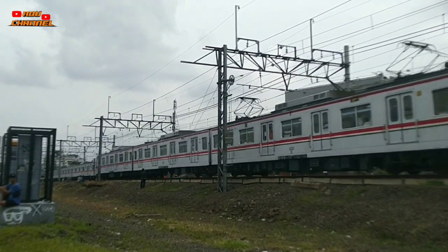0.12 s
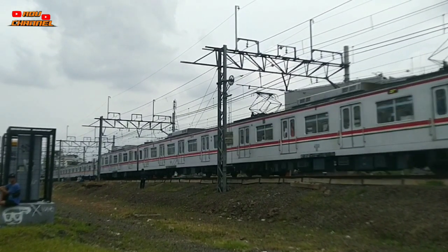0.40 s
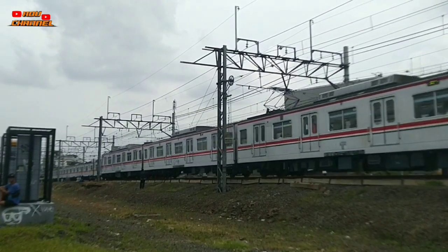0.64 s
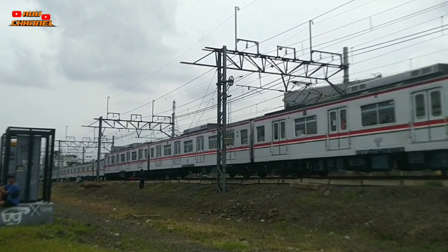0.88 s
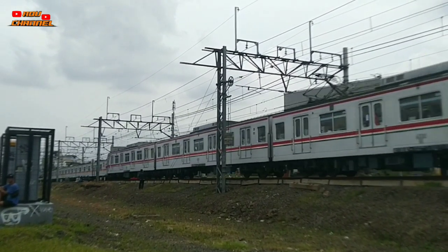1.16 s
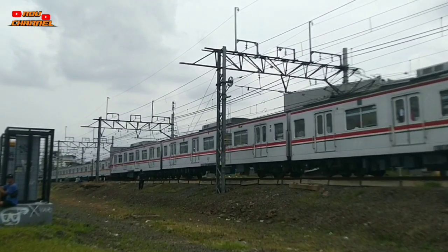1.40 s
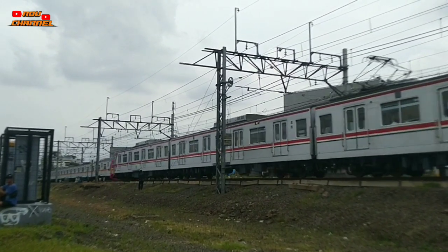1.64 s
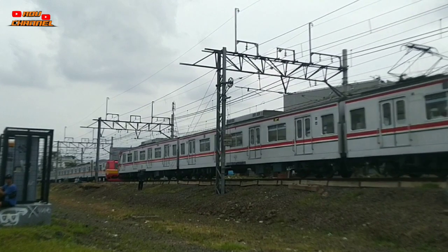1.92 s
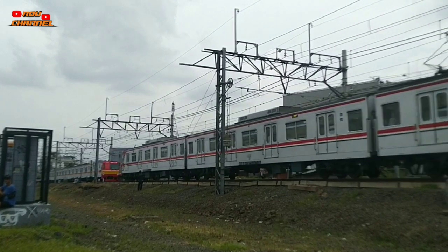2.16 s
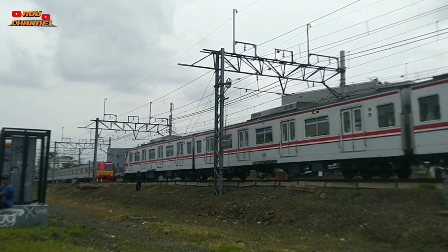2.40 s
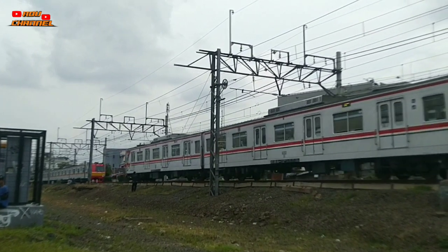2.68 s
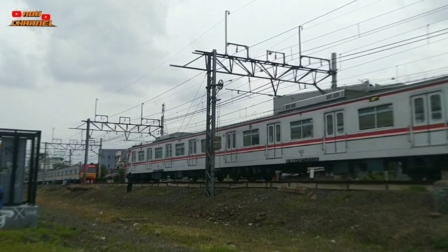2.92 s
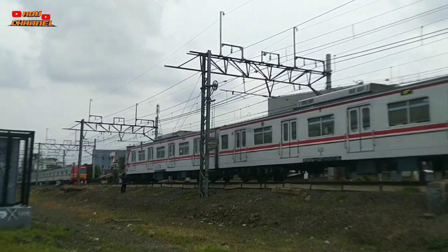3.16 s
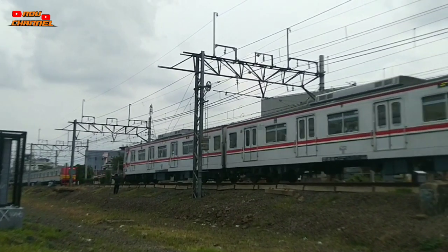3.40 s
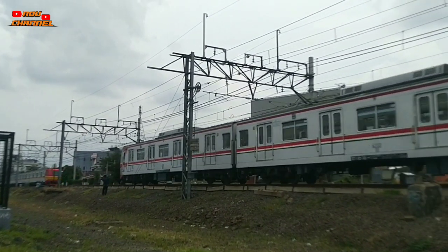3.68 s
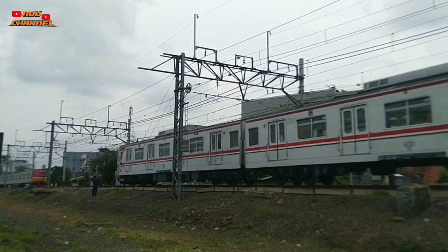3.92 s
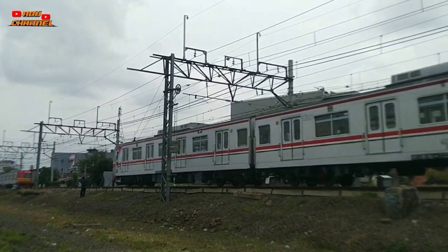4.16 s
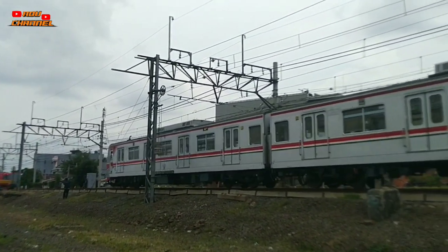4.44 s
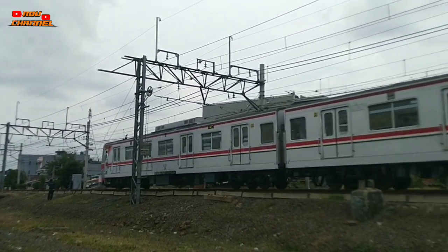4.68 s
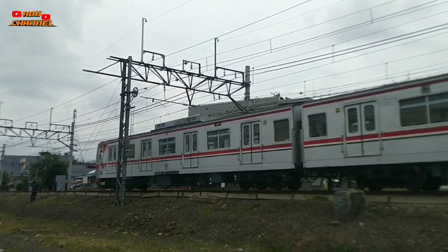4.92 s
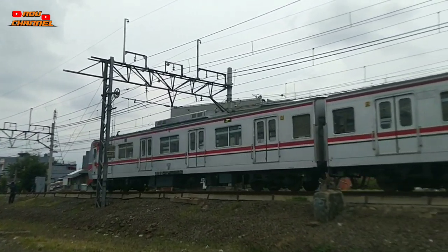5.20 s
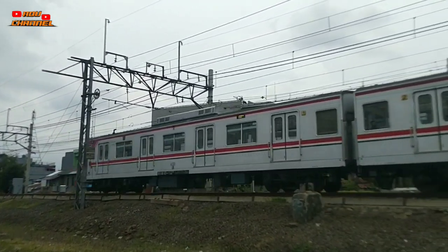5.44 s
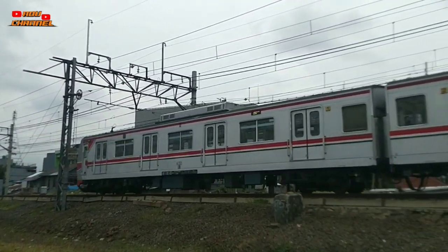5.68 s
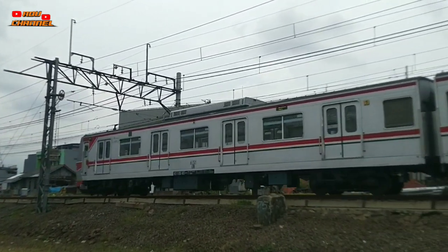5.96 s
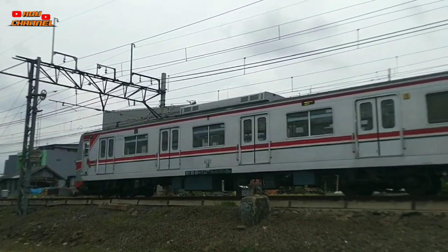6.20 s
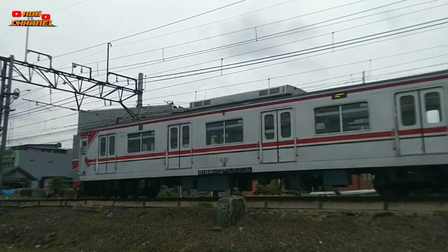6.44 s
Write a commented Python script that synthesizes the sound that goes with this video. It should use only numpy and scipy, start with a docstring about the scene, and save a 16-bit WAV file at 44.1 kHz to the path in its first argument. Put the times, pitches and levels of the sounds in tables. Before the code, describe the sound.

Train cars roll by outdoors at moderate speed, already passing at the start and still passing at the end. Wheel blows come in pairs and overlapping clusters, dull thumps mixed with hard metallic clacks. Rolling noise fills the gaps, with airy hiss swelling and fading, wavering gear hums and one tiny late squeal. The handheld stereo pickup is near the track, its automatic gain dipping after loud hits.

```python
"""Electric train over rail joints

A braking train rolls past over four rail joints. Each axle's blow gives a deep thud (damped sines) with a boom
of the track bed, and at some joints a bright steel clank (noise bursts through resonances). Beneath run rolling
noise and swells of hiss (shaped random spectra), faint gliding hums and one short squeal (wavering tones).
Gain control ducks the sound after each strong blow."""
import sys
import numpy as np
from scipy import signal
from scipy.fft import rfft, irfft
from scipy.io import wavfile
from scipy.ndimage import uniform_filter1d

SR = 44100
rng = np.random.default_rng(int(sys.argv[2]) if len(sys.argv) > 2 else 0)


def waveform_to_disk(signal):
    """Save audio, clipped to [-1, 1], as 16-bit WAV at the path in sys.argv[1]."""
    frames = np.transpose(np.atleast_2d(signal))
    scaled = np.clip(frames, -1, 1) * 32767
    samples = np.round(scaled).astype(np.int16)
    wavfile.write(sys.argv[1], SR, samples)


def magnitude_from_level(level_db):
    """Linear magnitude for a level in decibels (20 dB per decade)."""
    exponent = np.asarray(level_db, float) / 20
    return 10 ** exponent


N = 290178

CAR_M = 20  # car length


def evened(x):
    """Normalization: divides a signal by its root mean square."""
    return x / np.sqrt(np.mean(x ** 2) + 1e-20)


def read(points, hz):
    """Spectral interpolation: reads a curve linearly along a logarithmic frequency axis."""
    point_hz, value = np.transpose(points)
    return np.interp(np.log(hz + 1), np.log(point_hz + 1), value)


def add(mix, start_s, sound):
    """Superposition: adds a sound to the mix in place, cut off at the end of the mix."""
    part = mix[max(round(start_s * SR), 0):][:len(sound)]
    part += sound[:len(part)]


def travelled(t):
    """Uniform deceleration: metres the train has rolled after t seconds."""
    speed_m_s, braking_m_s2 = 7.839, .01514
    return speed_m_s * t - braking_m_s2 * t ** 2 / 2


def hiss_db(t):
    """Periodicity of a train: one car's hiss pattern repeats with distance, and single swells add in power."""
    # Level of the hiss along one car. Each row: distance travelled in metres, level in dB.
    car_hiss = [(0, -48), (1.1, -47), (2.2, -50), (9, -48.5), (10.5, -44.5), (11.2, -49), (12.3, -49),
                (13, -45), (14, -49), (15.1, -41), (15.9, -45.5), (16.4, -52.5), (18.9, -46), (20, -54)]
    # Single swells of hiss, the last one very brief.
    # Each row: centre in seconds, half width (to 1/e of the power) in seconds, level in dB.
    swell_rows = [(3.6, 0.22, -42.5), (5.83, 0.19, -45), (6.17, 0.19, -41.5), (6.5, 0.023, -51)]
    swells = sum(magnitude_from_level(2 * db) * np.exp(-((t - s) / width_s) ** 2) for s, width_s, db in swell_rows)
    car_db = np.interp(travelled(t) % CAR_M, *np.transpose(car_hiss))
    return 10 * np.log10(magnitude_from_level(2 * car_db) + swells)


def rolling(patchy_db=.8, banding_db=1.6, flicker_db=1.1):
    """Roughness excitation: wheel and rail roughness as random spectra, in four parts with moving levels."""
    # Mean levels of the passing cars. Each row: time in seconds, rumble in dB, rail drone in dB, wheel roar in dB.
    roll = [(0.0, -25.5, -38, -38), (0.6, -26, -34, -32.5), (1.1, -26.5, -30.5, -31),
            (1.9, -27, -34.5, -32), (2.7, -24.5, -33, -32), (3.5, -28, -31.5, -33),
            (4.2, -26, -35.5, -34.5), (4.8, -27.5, -36, -35.5), (5.5, -23, -35, -34.5),
            (6.58, -27.5, -35, -35)]
    # Colour of each part. Each row: frequency in Hz, relative spectral density in dB.
    rumble = [(26, -38), (45, -20.5), (76, 4), (100, 4.5), (130, -3.5), (175, -0.5), (215, 0), (273, -2.5),
              (345, -14), (420, -9), (550, -13.5), (920, -120)]
    drone = [(220, -60), (380, 6), (419, -4.5), (548, -8), (601, 5), (750, 1), (1300, -5), (1690, -29),
             (2860, -120)]
    roar = [(740, -51), (1250, -13), (1480, 0.5), (1700, -3.5), (1860, -4.5), (2030, -2.5), (2250, -5.5),
            (2480, -8), (2800, -6), (3060, -14), (3540, -17), (4300, -20.5), (6700, -30.5), (10000, -34.5),
            (16000, -97)]
    hiss = [(2500, -40), (3500, -1), (6000, -6), (9000, -2.5), (11800, -7), (13300, -6.5), (14200, -23),
            (15400, -8), (16000, -67)]

    frames, hz = N // 256 + 5, np.fft.rfftfreq(1024, 1 / SR)
    t = np.arange(frames) * 256 / SR
    a, b, c, d, patches, bands = rng.standard_normal((frames, 513, 6)).T  # each: frequency by time
    patches = uniform_filter1d(uniform_filter1d(patches, size=8, axis=0), size=12, axis=1)
    patches = evened(patches)
    # narrow bands of the noise swell and fade at random, each for about a third of a second
    bands = uniform_filter1d(uniform_filter1d(bands, size=2, axis=0), size=60, axis=1)
    bands = evened(bands) * np.clip(hz / 600, 0, 1)[:, None]  # the bass stays even
    flicker = evened(uniform_filter1d(rng.standard_normal(frames), size=6))

    s, *rolling_db = np.transpose(roll)
    levels_db = [np.interp(t, s, db) for db in rolling_db] + [hiss_db(t)]
    power = 0
    for colour, level_db in zip((rumble, drone, roar, hiss), levels_db):
        shape = magnitude_from_level(read(colour, hz)) ** 2
        power = power + np.outer(shape / shape.sum(), magnitude_from_level(level_db) ** 2)

    noise = np.array([a + 1j * b, c + 1j * d])  # two independent channels
    unit = signal.istft(noise / np.sqrt(513), nperseg=1024, noverlap=768)[1].std()
    unevenness_db = patchy_db * patches + banding_db * bands + flicker_db * flicker
    spectra = noise * np.sqrt(power) * magnitude_from_level(unevenness_db)
    return signal.istft(spectra, nperseg=1024, noverlap=768)[1][:, :N] / unit


def blows():
    """Kinematics of impact: a blow falls when an axle meets a joint.

    Rows in time order: (s, thud dB, thud Hz, sleeper dB, rail dB, wheel dB, rim dB)."""
    # Axle positions in metres ahead of a car's last axle.
    car_axles_m = (0, 2.1, 13.8, 15.9)
    # Rail joints in metres ahead of where the train's last axle starts.
    joints_m = (28.96, 45.61, 59.44, 62.395)
    # Sound of each joint. Each row: thud in dB, thud pitch in Hz, then sleeper, rail, wheel and rim hiss in dB,
    # all levels before the axle's own strength is added.
    joints = [(-16.5, 148.6, -32, -29, -27, -42), (-11.5, 175, -43.5, -28.5, -67, -52),
              (-10, 180, -27, -38, -103, -53.5), (-12, 179.8, -17.5, -21, -21.5, -39)]
    # Strength of each axle, counted from the tail. Each row: thud, sleeper, rail and wheel, in dB added to the joint.
    axles = [(-0.5, 4.5, -3.5, 0.5), (-5.5, 9, 4.5, -1), (-2.5, -1, 3, 0.7), (1, -3, 1.5, 2),
             (0.7, -2.5, 0, 2), (0.9, 1.5, 1.8, -0.2), (0.8, 3.5, -3.5, 0.5), (2, -2.5, -0.5, -4.2),
             (0, 5, -5.5, -4.5), (0, 0.7, -3, 1.5), (1.9, 3, -6, -30), (4, 1, -5.5, -2.5),
             (-6, 3.5, -3.5, -3.5), (-12, 4, -0.5, 1)]
    t, rows = np.arange(N) / SR, []
    for k, (thud_db, sleeper_db, rail_db, wheel_db) in enumerate(axles):
        car, axle = divmod(k, len(car_axles_m))
        ahead_m = CAR_M * car + car_axles_m[axle]
        for place_m, joint in zip(joints_m, joints):
            if 0 < place_m - ahead_m < travelled(t[-1]):
                s = np.interp(place_m - ahead_m, travelled(t), t)
                # the rim follows the wheel's strength
                rows.append((s, *np.add(joint, (thud_db, 0, sleeper_db, rail_db, wheel_db, wheel_db))))
    return sorted(rows)


def thuds(rise_s=.011, hold_s=.024, early_s=.006):
    """Damped oscillation: loaded by a wheel, sleepers and track swing up, hold while it presses, and die away."""
    # Modes of the track. Each row: frequency as a factor on the thud pitch, level in dB, decay by 60 dB in seconds.
    track = [(1.0, 0, .1), (.52, -12, .07), (1.47, -14, .06)]
    t, out = np.arange(SR // 4) / SR, np.zeros(N)
    swell = np.sin(np.pi / 2 * np.minimum(t / rise_s, 1)) ** 2
    after = np.maximum(t - hold_s, 0)
    for s, db, hz, *_ in blows():
        ring = sum(magnitude_from_level(level_db - 60 * after / t60) * np.sin(2 * np.pi * hz * factor * t)
                   for factor, level_db, t60 in track)
        thud = swell * ring
        add(out, s - early_s, magnitude_from_level(db) * thud / abs(thud).max())
    return out


def resonate(x, hz, width):
    """Heterodyne resonance: shifts the curve hz to zero, smooths twice and shifts back, with gain 1 at the peak."""
    turn = np.exp(2j * np.pi * np.cumsum(hz) / SR)
    r = np.exp(-np.pi * width / SR)
    return 2 * (turn * signal.lfilter([(1 - r) ** 2], [1, -2 * r, r * r], x / turn)).real


def clanks(modes, column, t60, crack_db, rattle_s, rise_s):
    """Modal excitation by impact: a sharp crack, then a moment's rattle of noise, rings the given resonances."""
    t, shake = np.arange(SR // 3) / SR, np.zeros(N)
    crack = magnitude_from_level(crack_db) * np.exp(-t / 0.0011)
    rattle = magnitude_from_level(-60 * np.maximum(t - rattle_s, 0) / t60)
    shape = np.minimum(t / rise_s, 1) * (crack + rattle)
    rows = blows()
    for row in rows:
        add(shake, row[0] - .001, magnitude_from_level(row[column]) * shape)
    # every blow shifts each resonance at random, so that no two blows ring quite alike
    blow = np.searchsorted([row[0] - .002 for row in rows], np.arange(N) / SR)
    detune = rng.uniform(.94, 1.06, (len(rows) + 1, len(modes)))[blow].T
    scale = sum(magnitude_from_level(2 * db) * width for _, width, db in modes) * np.pi / SR  # evens out the modes' total power
    channels = [sum(magnitude_from_level(db) * resonate(noise * shake, hz * k, width)
                    for (hz, width, db), k in zip(modes, detune))
                for noise in rng.standard_normal((2, N))]
    return np.array(channels) / np.sqrt(scale)


def hums(width_hz=6.5, throb_db=3.2):
    """Frequency and amplitude modulation: each tone of motor, gear or squeal wavers, throbs and glides in pitch."""
    # Faint hums of motors and gears going by, and one short wheel squeal.
    # Each row: start in seconds, end in seconds, first frequency in Hz, last frequency in Hz, level in dB.
    tones = [(.85, 2.0, 875, 865, -44), (1.0, 2.2, 935, 915, -46), (1.2, 2.7, 780, 768, -41),
             (1.4, 2.7, 618, 612, -44), (1.9, 2.9, 690, 670, -45), (2.4, 3.3, 497, 500, -41),
             (2.6, 5.4, 760, 748, -48), (3.8, 4.9, 640, 625, -48), (5.45, 5.55, 4570, 4550, -48)]
    out = np.zeros(N)
    for start, end, first_hz, last_hz, db in tones:
        count = round((end - start) * SR)
        waver, throb = (evened(uniform_filter1d(v, size=2400))[:count] for v in rng.standard_normal((2, N)))
        hz = np.linspace(first_hz, last_hz, count) + width_hz * waver
        tone = np.sqrt(2) * np.sin(2 * np.pi * np.cumsum(hz) / SR)
        add(out, start, magnitude_from_level(db + throb_db * throb) * tone * signal.windows.tukey(count, .6))
    return out


def ports(first, second):
    """Interchannel coherence: two microphone ports, most alike in the bass, the left earlier, the right louder."""
    # Each row: frequency in Hz, left-right likeness from 0 to 1.
    likeness = [(60, .99), (270, .985), (500, .8), (900, .65), (1500, .55), (2500, .4), (5000, .2),
                (14000, .2)]
    # Each row: frequency in Hz, level of left minus right in dB.
    lean_points = [(60, -4.0), (180, -2.3), (270, -3.4), (440, -4.0), (730, -1.5), (1210, -3.0),
                   (2000, -6.0), (3300, -3.0), (5440, -.5), (8980, -.3), (14800, -3.5)]
    # Each row: frequency in Hz, phase by which the left port leads in radians.
    lead = [(60, .1), (270, .33), (600, 1.15), (860, .9), (1250, 1.9), (1500, 4.2), (2100, 4.8),
            (3300, 8.0), (4500, 12), (5200, 14), (15000, 30)]
    hz = np.fft.rfftfreq(N, 1 / SR)
    same = np.clip(read(likeness, hz), 0, 1)
    left = rfft(first)
    right = same * left + np.sqrt(1 - same ** 2) * rfft(second)
    right = right * np.exp(-1j * read(lead, hz))
    lean = magnitude_from_level(read(lean_points, hz) / 2)  # half of the difference on each side
    return irfft(np.array([left * lean, right / lean]), N)


def scene():
    """Superposition: rolling noise, blows on track and steel, and hums add up at the two ports."""
    # Resonances of sleeper, rail, wheel, wheel rim and track bed.
    # Each row: frequency in Hz before the detuning of each blow, width of each smoothing in Hz, relative level in dB.
    sleeper = [(288.8, 113, -0.5), (380, 135, -4.5), (446, 27, -4)]
    rail = [(650, 276, -0.5), (782, 300, 11.5), (989, 92, 10)]
    wheel = [(1490, 580, 5.7), (1750, 390, 7.4), (2000, 122, 11.2), (2293, 770, 2.6)]
    rim = [(3980, 2700, 13.5), (5830, 2800, 1), (10940, 1400, 3.5)]
    ballast = [(168.2, 43.4, 1.2), (245.6, 65.4, -3)]
    clank = clanks(sleeper, column=3, t60=0.29, crack_db=-8.0, rattle_s=0.023, rise_s=.004)
    clank += clanks(rail, column=4, t60=0.28, crack_db=4.0, rattle_s=0.018, rise_s=0.00099)
    clank += clanks(wheel, column=5, t60=0.33, crack_db=0.0, rattle_s=0.014, rise_s=0.00054)
    clank += clanks(rim, column=6, t60=0.7, crack_db=8.0, rattle_s=0.034, rise_s=0.00085)
    # the bed of the track booms on after a blow
    boom = magnitude_from_level(-11) * clanks(ballast, column=1, t60=.4, crack_db=-20, rattle_s=.03, rise_s=.015)[0]
    return ports(*(boom + rolling() + clank + thuds() + hums()))


def roll_off(x):
    """The treble ends steeply here."""
    return signal.sosfilt(signal.butter(12, 15410, fs=SR, output="sos"), x)


def record(dry):
    """Dynamic compression: after microphone filtering, the gain falls just after a blow and recovers slowly."""
    # The housing cancels a treble band. Each row: frequency in Hz, gain in dB.
    mic_dip = [(6500, 0), (7500, -5), (8200, -19), (8900, -5), (10000, 0)]
    bass_cut_hz = 47.6
    knee_db, squeeze, attack_s, recovery_db_s = -19, .45, .018, 40  # recovery of the held level, before squeeze
    coloured = irfft(rfft(dry) * magnitude_from_level(read(mic_dip, np.fft.rfftfreq(N, 1 / SR))), N)
    bass_cut = signal.butter(4, bass_cut_hz, "high", fs=SR, output="sos")
    heard = signal.sosfilt(bass_cut, coloured)

    power_db = 10 * np.log10(abs(uniform_filter1d((heard ** 2).mean(0), size=300)) + 1e-12)
    fall_db = np.arange(N) * recovery_db_s / SR
    held_db = np.maximum.accumulate(power_db + fall_db) - fall_db  # peaks held, sinking steadily
    over_db = np.maximum(held_db - knee_db, 0)
    lag = np.exp(-1 / (attack_s * SR))  # the first cycles of a blow slip through
    ducked = heard / magnitude_from_level(squeeze * signal.lfilter([1 - lag], [1, -lag], over_db))
    return roll_off(ducked)


dry = scene()
out = record(dry)
waveform_to_disk(out)
```